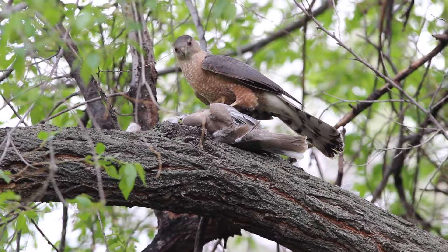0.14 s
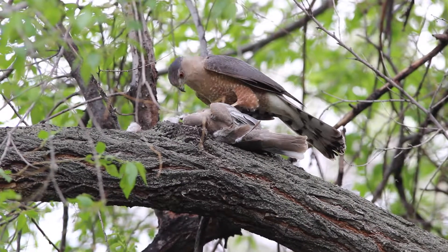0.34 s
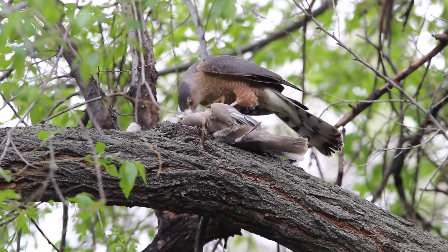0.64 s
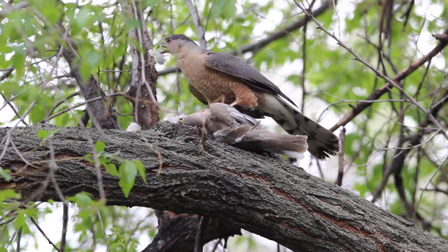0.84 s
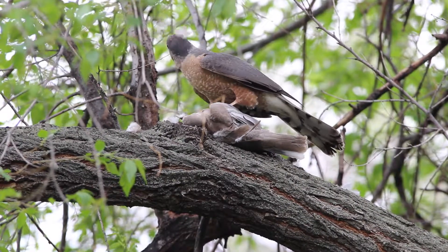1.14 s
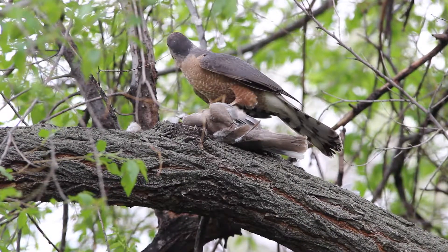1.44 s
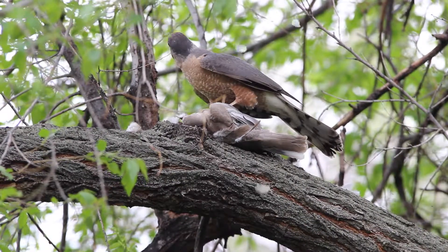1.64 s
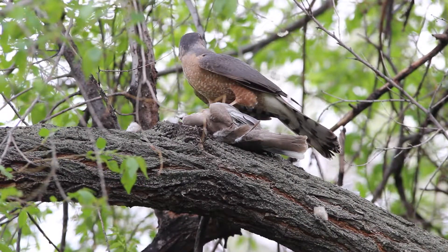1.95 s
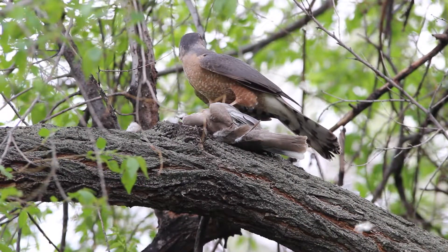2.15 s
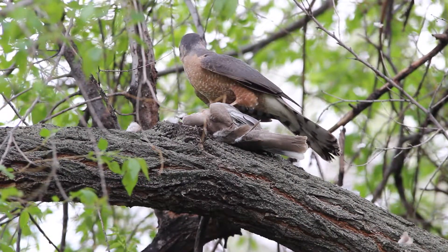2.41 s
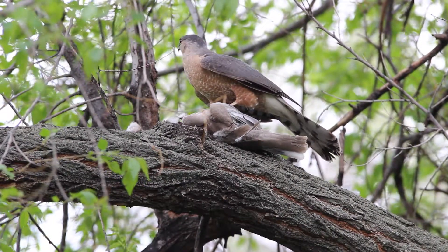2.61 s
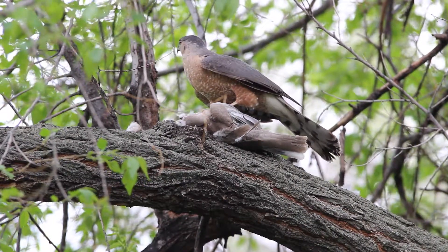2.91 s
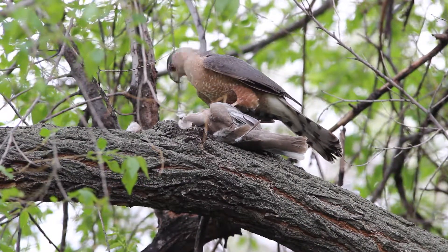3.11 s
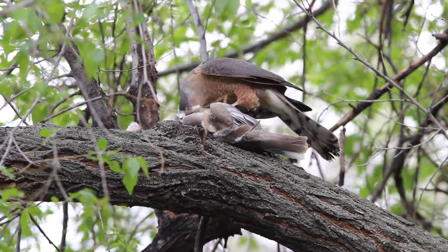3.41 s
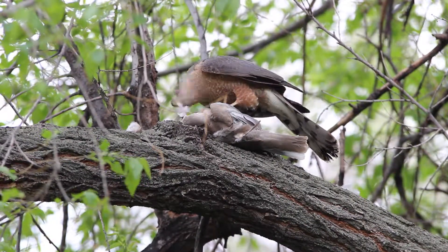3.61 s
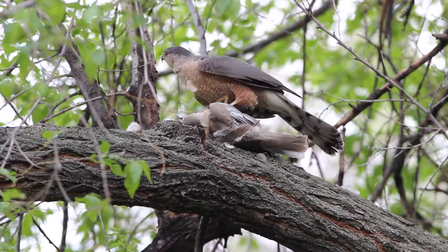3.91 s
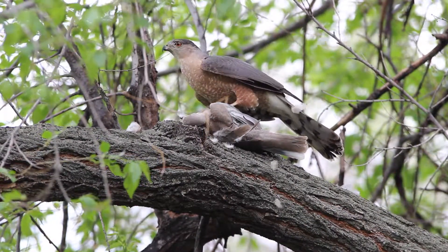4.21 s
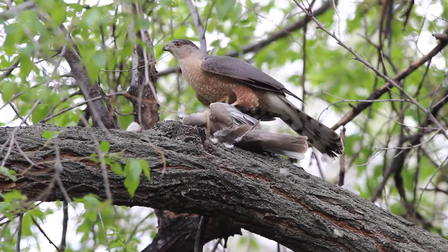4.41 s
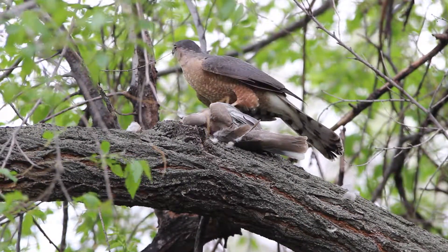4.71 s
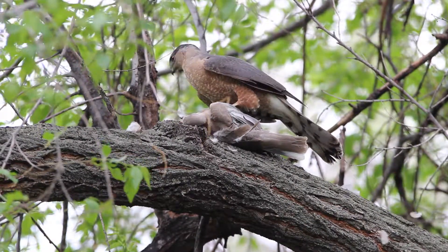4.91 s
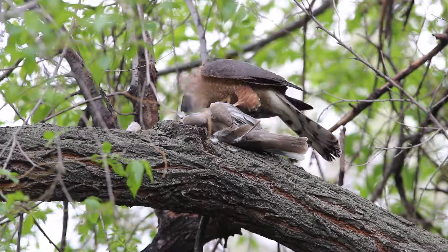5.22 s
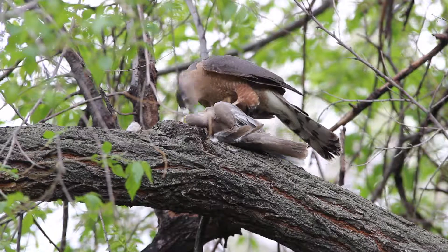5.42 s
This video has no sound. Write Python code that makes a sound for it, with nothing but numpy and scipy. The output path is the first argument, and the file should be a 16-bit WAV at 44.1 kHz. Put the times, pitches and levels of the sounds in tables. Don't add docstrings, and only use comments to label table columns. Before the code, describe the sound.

Several jays scold loudly among trees: a pair of screams, a short gap, a group of four, about a second of rest, then a fast overlapping volley of nine. Each scream starts with a tiny chirp, rings nasally, sags in pitch and breaks into rasp. Underneath are a soft low traffic-like rumble, small early ticks and very faint whistles. Mono, outdoors, light echo off trunks.

```python
import sys
import numpy as np
from scipy import signal
from scipy.fft import rfft, irfft, next_fast_len
from scipy.io import wavfile
from scipy.ndimage import uniform_filter1d

SR = 44100
rng = np.random.default_rng(int(sys.argv[2]) if len(sys.argv) > 2 else 0)


def log_audio(samples):
    frames = np.atleast_2d(samples).T
    limited = np.clip(frames, -1, 1)
    pcm = np.round(limited * 32767).astype(np.int16)
    wavfile.write(sys.argv[1], SR, pcm)


def convert_level_to_amplitude(level_db):
    exponent = np.asarray(level_db, float) / 20
    return 10 ** exponent


N = 244752

# frequency in Hz, density in dB per Hz.
HUM_SPECTRUM = [(13, -57.5), (22, -32), (49, -6), (109, -0.5), (178, -3.5), (269, -7), (566, -6.5),
                (705, -6), (1190, -9.5), (2120, -26.5), (3120, -29.5), (3680, -31.5), (4840, -35.5),
                (14200, -42), (15800, -35)]
# time in seconds, peak level in dB, centre in Hz, bandwidth in Hz.
TWIG_TICKS = [
    (.165, -44.5, 5500, 900),
    (.198, -54.5, 8700, 700),
    (.635, -47.5, 4550, 6000),
    (.737, -57, 9600, 700),
    (.92, -54, 6000, 1500),
    (1.085, -54, 5000, 5000),
    (1.205, -51, 4040, 5000),
    (1.262, -53, 5500, 4000),
]
# start in seconds, length in seconds, first pitch in Hz,
# last pitch in Hz, level in dB.
WHISTLES = [(0.197, 0.063, 3288, 3640, -65.5), (0.253, 0.034, 4390, 3970, -64),
            (.255, 0.033, 3980, 3000, -63), (.284, 0.02, 3020, 2800, -68), (0.345, 0.013, 2400, 3700, -66),
            (.398, .03, 2890, 2840, -65), (0.283, 0.08, 2086, 2360, -66), (.368, 0.03, 3750, 3020, -62),
            (0.843, 0.085, 3130, 3350, -66.5), (.925, .06, 2960, 2880, -65), (.95, .05, 2800, 2450, -71),
            (1.2, 0.11, 3500, 3770, -74.5), (1.357, 0.026, 4300, 3800, -73), (1.532, .035, 3700, 2930, -67),
            (3.01, 0.027, 4100, 2910, -49), (3.401, .05, 4360, 3300, -64), (3.418, 0.044, 4980, 4000, -68),
            (3.448, 0.048, 3330, 3180, -65), (3.484, 0.047, 2690, 2900, -61),
            (3.867, .055, 4000, 2630, -69.5), (3.932, 0.08, 3020, 2770, -63.5),
            (3.962, .1, 2750, 2660, -67), (4.048, 0.058, 2250, 2220, -69)]
# decay time by 60 dB in seconds, level in dB, top frequency in Hz.
TREE_ECHOES = [(0.202, -12, 11600), (1.3, -27.5, 3800)]
# start in seconds, length in seconds, 4th overtone in dB, swell time in seconds,
# opening chirp in dB.
SCREAMS = [(1.578, 0.37, -20.5, 0.022, -18), (1.611, 0.36, -13.5, 0.03, -19),
           (2.116, 0.32, -17, 0.027, -17.5), (2.351, 0.36, -14.5, 0.037, -13.5),
           (2.44, 0.26, -24, 0.027, -25), (2.657, 0.29, -17.5, 0.025, -16.5),
           (4.123, 0.38, -25.5, 0.006, -21), (4.197, 0.33, -14.5, 0.0055, -14),
           (4.514, 0.28, -22, 0.073, -27), (4.677, .299, -24.5, 0.0092, -22),
           (4.844, .231, -22.5, .03, -27), (5.007, .345, -14, 0.026, -18.5),
           (5.039, .305, -22, 0.043, -14.5), (5.344, .25, -23.5, 0.028, -25),
           (5.421, 0.19, -17.5, 0.082, -22)]
# first pitch in Hz, time of peak in seconds, peak in Hz,
# last pitch in Hz, bend of the sag as an exponent.
PITCH_ARCS = [(787, .05, 799, 700, .75), (778.6, .06, 799, 700, 1.15), (770, 0.0303, 804, 730, .85),
              (782, .05, 808, 685, 1.6), (795, 0.032, 830, 740, 0.74), (811, 0.0305, 802, 742, 1.3),
              (746, .075, 768, 700, 1.4), (794, .055, 811, 664, 1.9), (803, .03, 800, 695, 1.3),
              (790, .03, 786, 695, 1.4), (775, 0.0582, 840, 774, 1.5), (790, .07, 806, 662, 1.25),
              (831, .055, 821, 734, 0.88), (754, .08, 785, 680, 2.1), (784, 0.073, 828, 774, 1.6)]
# rasp onset as a share of the length, rasp level in dB, its deficit while
# clean in dB, tone drop as a share of the length, depth of the drop in dB.
VOICE_BREAKS = [(0.48, -23, 17, 0.56, 12), (.5, -19, 21, 0.74, 14), (0.57, -22.5, 24, 0.85, 22),
                (0.65, -21.5, 20, 0.79, 21), (0.71, -21, 19, 0.84, 13), (0.65, -20, 8, 0.8, 14),
                (0.59, -23, 25, 0.71, 8), (0.76, -23, 15, .77, 17), (0.66, -20.5, 13, .78, 18),
                (0.59, -29.5, 5, .8, 8), (0.86, -27, 13, 0.88, 22), (0.64, -20.5, 10, .68, 14),
                (0.59, -19, 21, 0.65, 15), (0.67, -24, 22, .95, 1), (0.66, -25, 14, .95, 1)]
# 2nd, 3rd, 5th, 6th and upper overtones, all in dB.
THROAT_COLOURS = [(-44.5, -36.5, -35, -28, -43), (-39, -40, -39, -31, -41), (-39.5, -36, -36.5, -28, -43.5),
                  (-46, -34.5, -41, -34.5, -39), (-42, -41, -58, -44, -49), (-40, -32, -43, -30, -46.5),
                  (-52, -48, -42, -38, -44), (-42.5, -38, -36.5, -33, -34.5), (-42, -37, -55, -31.5, -48.5),
                  (-49.5, -45.5, -38, -34.5, -47), (-43, -40.5, -41, -35, -48),
                  (-40, -39, -39, -31.5, -39.5), (-40.5, -33, -50, -26.5, -40), (-51, -45, -42, -39, -47),
                  (-42.5, -43, -33.5, -34, -48)]
# 7th, 8th and 9th overtone in dB over the upper ones, half-pitch lines in dB.
BEAK_OPENINGS = [(5, 2.5, 7.5, -63), (-1.5, 2, 3, -60), (6.5, 0, 9.5, -52), (-1.5, 0.5, -5, -35.5),
                 (5, -9, 0, -55), (6.5, -1, 2.5, -52), (3, 3, 2, -58.5), (-2, 2, -5, -32.5),
                 (5, 1, 6.5, -57), (-1, 5, -1, -61), (-3, -6, 5.5, -52), (-4, 1, -0.5, -42),
                 (3.5, -9, -6, -52), (0, 2, 4, -57), (5, -1, 4, -54)]
# overtone number, level in dB.
CHIRP_OVERTONES = [(2, -6), (3, -14), (4, 0), (5, -10), (7, -18), (8, -16), (9, -24)]
# frequency in Hz, level in dB.
UPPER_ENVELOPE = [(7000, -1), (9000, -7.5), (11000, -15), (13000, -12.5), (15500, -26)]
# frequency in Hz, density in dB per Hz.
RASP_SPECTRUM = [(900, -64), (1400, -13.5), (1750, -20.5), (2000, -19), (2400, -11), (2900, 0),
                 (3750, -0.5), (4400, -6), (5150, -9.5), (6250, -6.5), (7800, -19), (10000, -34.5),
                 (12000, -25.5), (15900, -46)]
# frequency in Hz, density in dB per Hz.
BREATH_SPECTRUM = [(3000, -33), (5000, -13), (7000, 3.5), (9500, -6), (12000, -3), (14000, -15),
                   (15800, -20.5)]

CHIRP_HZ, CHIRP_S = 1189, 0.0076
SCOOP, SCOOP_S = .13, .0045
DRIFT, TURN_DB = .004, 2.5
THROAT_HZ, THROAT_WIDTH_HZ = 4760, 137
SWELL_DB, BREAK_S, DROP_S = 11, 0.023, 0.024
UPPER_FADE = 0.2
SETTLE_DB, SETTLE_S = -12.5, 0.019
GROW_DB, GUST_DB = 5, 2.05
SONG_BEND, SONG_BLUR = 1.15, .012


def level(x, db):
    return x * convert_level_to_amplitude(db) / np.sqrt(np.mean(x ** 2))


def curve(points, hz):
    at, db = np.transpose(points)
    return np.interp(np.log(np.maximum(hz, 1)), np.log(at), db)


def colour(x, points):
    size = next_fast_len(len(x))
    hz = np.arange(size // 2 + 1) * SR / size
    return irfft(rfft(x, size) * convert_level_to_amplitude(curve(points, hz)), size)[:len(x)]


def walk(rate, count):
    hold = max(int(SR / rate), 4)
    draws = rng.standard_normal(count // 4 + 1)[:count // hold + 1]
    held = np.repeat(draws, hold)[:count]
    return 1.3 * uniform_filter1d(uniform_filter1d(held, hold), hold)


def add(out, s, x):
    i = int(s * SR)
    out[i:i + len(x)] += x[:N - i]


def cycles(hz):
    return 2 * np.pi * np.cumsum(hz) / SR


def town():
    hum = level(colour(rng.standard_normal(N), HUM_SPECTRUM), -37.5)
    bass = signal.sosfilt(signal.butter(2, 150, fs=SR, output="sos"), hum)
    treble = hum - bass
    return bass * convert_level_to_amplitude(1.2 * walk(2.7, count=N)) + treble * convert_level_to_amplitude(0.12 * walk(2.4, count=N))


def ticks():
    out = np.zeros(N)
    u = np.linspace(-1, 1, 600)
    for s, db, hz, width in TWIG_TICKS:
        carrier = np.cos(2 * np.pi * hz * np.arange(len(u)) / SR)
        grain = walk(max(width, 300) * 1.1, count=len(u)) * carrier
        add(out, s - .007, convert_level_to_amplitude(db) * np.exp(-(u / 0.56) ** 2) * grain)
    return out


def songbirds():
    out = np.zeros(N)
    for s, length, from_hz, to_hz, db in WHISTLES:
        u = np.linspace(0, 1, int(length * SR))
        glide_hz = from_hz + (to_hz - from_hz) * u ** SONG_BEND
        phase = cycles(glide_hz * (1 + SONG_BLUR * walk(200, count=len(u))))
        loudness = convert_level_to_amplitude(db + 11.5 + 2.0 * walk(91, count=len(u)))
        add(out, s, loudness * np.sin(np.pi * u) ** 0.19 * np.sin(phase))
    return out


def trees(x):
    t = np.arange(int(1.5 * SR)) / SR
    tail = 0
    for t60, db, top_hz in TREE_ECHOES:
        decay = np.exp(-np.log(1000) * t / t60) * np.clip(t / 0.019, 0, 1)
        noise = rng.standard_normal(len(t)) * decay
        noise = signal.sosfilt(signal.butter(2, top_hz, fs=SR, output="sos"), noise)
        tail = tail + convert_level_to_amplitude(db) * noise / np.sqrt(np.sum(noise ** 2))
    return signal.fftconvolve(x, tail)[:N]


def chirp(db):
    t = np.arange(int(CHIRP_S * SR)) / SR
    phase = cycles(CHIRP_HZ * (.97 + 0.065 * t / CHIRP_S))
    overtones = sum(convert_level_to_amplitude(d) * np.sin(k * phase) for k, d in CHIRP_OVERTONES)
    return convert_level_to_amplitude(db - 0.5) * np.sin(np.pi * t / CHIRP_S) * overtones


def effort(t, call, pitch, crack, shade):
    first_hz, peak_s, peak_hz, last_hz, bend = pitch
    climb = np.clip(1 - t / peak_s, 0, 1)
    sag = np.clip((t - peak_s) / (t[-1] - peak_s), 0, 1)
    hz = peak_hz - (peak_hz - first_hz) * climb ** 2 - (peak_hz - last_hz) * sag ** bend
    hz = hz * (1 + DRIFT * walk(28.1, count=len(t)))
    rasp_at, rasp_db, clean_db, drop_at, drop_db = crack

    def after(share, spread_s):
        return .5 + .5 * np.tanh((t - share * t[-1]) / spread_s)

    fade_db = drop_db * after(drop_at, DROP_S)
    fourth_db = call[2] - SWELL_DB * np.exp(-t / call[3]) - fade_db
    detuning = (6 * hz - THROAT_HZ) / THROAT_WIDTH_HZ
    sixth_db = shade[3] - 10 * np.log10(1 + detuning ** 2) - UPPER_FADE * fade_db
    torn_db = rasp_db - clean_db * (1 - after(rasp_at, BREAK_S)) + GROW_DB * (t / t[-1] - .8)
    settling_db = call[4] + SETTLE_DB - 6.7 * t / SETTLE_S
    rasp_db = np.maximum(torn_db, settling_db) + GUST_DB * walk(22, count=len(t))
    turn_db = TURN_DB * walk(13.7, count=len(t))
    upper_db = shade[4] - UPPER_FADE * fade_db - turn_db
    return hz, fourth_db, sixth_db + turn_db, upper_db, rasp_db


def rasp(hz):
    n = len(hz)
    phase = cycles(hz * (1 + .006 * walk(89.7, count=n)))
    slow = cycles(rng.uniform(.36, .44) * hz * (1 + .08 * walk(30, count=n)))
    flutter = 0.49 * np.cos(slow / 2) + .22 * walk(900, count=n)
    torn = 0
    for k in range(2, 21):
        lag, start = rng.uniform(0, 2 * np.pi, size=2)
        chop = 0.43 + np.cos(slow + lag) + flutter
        torn = torn + convert_level_to_amplitude(3.8 * walk(30.0, count=n)) * chop * np.cos(k * phase + start)
    return level(colour(torn, RASP_SPECTRUM), 0)


def hiss(count):
    return level(colour(rng.standard_normal(count), BREATH_SPECTRUM), 0)


def scream(call, pitch, crack, shade, beak):
    n = int(call[1] * SR)
    t = np.arange(n) / SR
    u = t / t[-1]
    hz, fourth_db, sixth_db, upper_db, rasp_db = effort(t, call, pitch, crack, shade)
    jitter = (0.0013 + 0.007 * u ** 3) * walk(150.8, count=n)
    hz = hz * (1 - SCOOP * np.exp(-t / SCOOP_S)) * (1 + jitter)
    phase = cycles(hz)
    tuned_db = fourth_db - 14 * np.exp(-t / 0.0042)
    named = [shade[0] - 14, shade[0], shade[1], tuned_db, shade[2], sixth_db]
    named += [upper_db + d for d in beak[:3]]
    tired_db = -9 * u ** 3
    tone = 0
    for k in range(1, 21):
        if k <= 9:
            db = named[k - 1]
        else:
            db = upper_db + curve(UPPER_ENVELOPE, k * hz) + 2.86 * walk(15.7, count=n)
            db = db - 8 * np.exp(-t / 0.017)
        if k in (2, 3) or k > 6:
            db = db + tired_db
        db = db + (0.71 + .16 * k) * walk(44.0, count=n)
        tone = tone + convert_level_to_amplitude(db + 5.5) * np.cos(k * phase + rng.uniform(0, 2 * np.pi))
    middle = np.exp(-((u - .52) / 0.12) ** 4)
    halves = sum(convert_level_to_amplitude(-2.5 * abs(k - 3.5)) * np.cos(k * phase + k) for k in np.arange(2.5, 10))
    voice = tone + convert_level_to_amplitude(beak[3] - 1.5) * middle * halves
    voice = voice + convert_level_to_amplitude(rasp_db + 14.0 * np.exp(-t / 0.006)) * rasp(hz)
    breath_db = upper_db - 5 + 11 * u + 2 * walk(25, count=n)
    voice = voice + convert_level_to_amplitude(breath_db) * hiss(count=n)
    return voice * np.clip(t / 0.0027, 0, 1) * np.clip((t[-1] - t) / 0.0097, 0, 1)


def jays():
    out = np.zeros(N)
    for call, pitch, crack, shade, beak in zip(SCREAMS, PITCH_ARCS, VOICE_BREAKS, THROAT_COLOURS,
                                               BEAK_OPENINGS):
        add(out, call[0], chirp(call[4]))
        add(out, call[0] + .8 * CHIRP_S, scream(call, pitch, crack, shade, beak))
    return out


def scene():
    near = jays()
    far = songbirds()
    return (near + far + trees(near + 1.8 * far) + ticks() + town())[None]


def top_cut(x):
    return signal.sosfilt(signal.butter(12, 15960, fs=SR, output="sos"), x)


def record(dry):
    loud_db = 10 * np.log10(uniform_filter1d(dry ** 2, size=SR // 8, axis=1) + 1e-9)
    gain_db = -.6 * np.maximum(loud_db + 15.0, 0)
    dry = signal.sosfilt(signal.ellip(8, .2, 60, 15900, fs=SR, output="sos"), dry)
    return top_cut(dry * convert_level_to_amplitude(gain_db) + .001)


dry = scene()
out = record(dry)
log_audio(out)
```